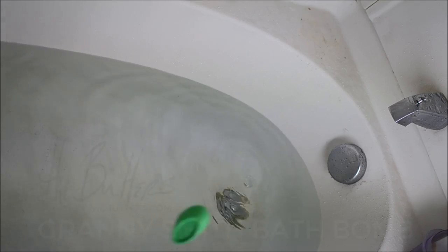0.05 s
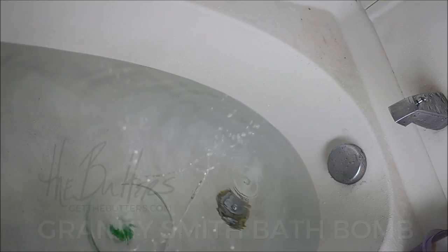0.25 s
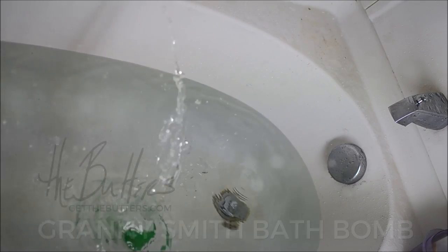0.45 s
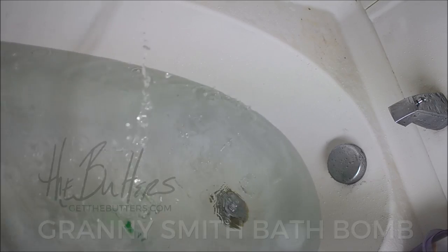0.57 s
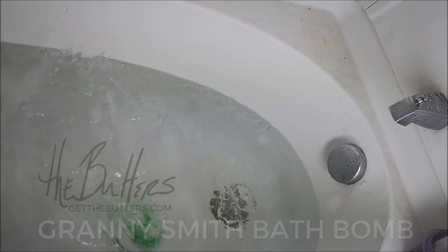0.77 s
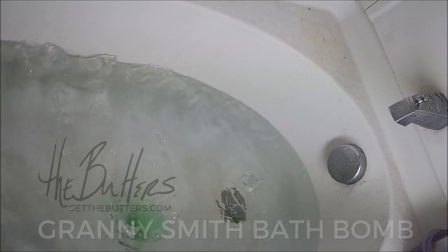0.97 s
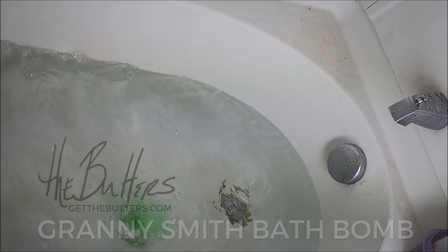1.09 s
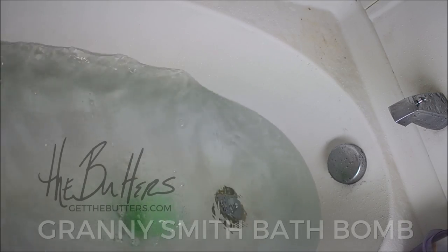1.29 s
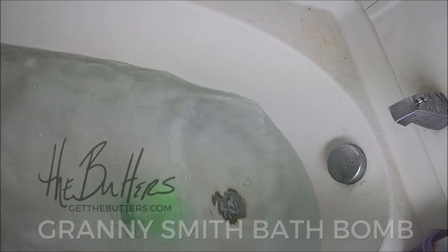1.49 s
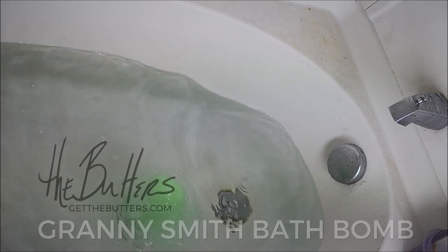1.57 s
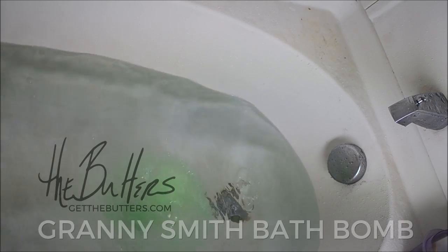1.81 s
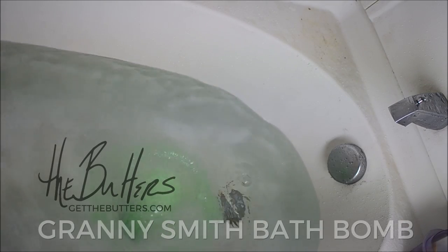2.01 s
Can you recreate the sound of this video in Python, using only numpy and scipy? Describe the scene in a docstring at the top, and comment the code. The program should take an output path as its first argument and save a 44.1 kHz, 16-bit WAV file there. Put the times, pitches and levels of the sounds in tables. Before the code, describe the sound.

A bath bomb drops into a full tub with a loud slapping splash and a hollow boom from the tub floor, then drops patter and bubble, fading to faint fizzing; close microphone, small tiled bathroom.

```python
"""Faint room tone and a few light ticks, then a slap: a solid ball drops into a full bathtub in a small tiled bathroom.
Its air cavity closes and it knocks the tub floor, which booms: damped sines for air pockets, decaying modes for the tub.
Thrown-up water falls back as bubbling drops and ticks: swarms of damped sines, shaped noise and short noise bursts.
Then the ball fizzes faintly: surging small bubbles under crackling noise. All but the room tone gets echoes and a tail."""
import sys
import numpy as np
from scipy import signal
from scipy.fft import rfft, irfft, next_fast_len
from scipy.io import wavfile
from scipy.ndimage import map_coordinates

SR = 44100
rng = np.random.default_rng(int(sys.argv[2]) if len(sys.argv) > 2 else 0)


def field_ratio(decibels):
    """Amplitude ratio for a level in dB (20 dB per decade); scalars and array-likes work."""
    return 10 ** (np.asarray(decibels, dtype=float) / 20)


def to_wav(s):
    """Save 16-bit WAV."""
    ch = np.atleast_2d(s).T  # columns
    pcm = np.round(np.clip(ch, -1, 1) * 32767)  # PCM
    wavfile.write(sys.argv[1], SR, pcm.astype(np.int16))


N = 90404

# Room tone spectrum: (frequency [Hz], relative level [dB per Hz])
AIR_SPECTRUM = [(30, -54), (60, -9), (262, -8), (480, -13), (620, -7), (730, -15), (953, -9.5), (1320, -17),
                (2360, -21.5), (5000, -39.5), (9000, -49), (15000, -74)]
# Droplets ticking on hard surfaces or bursting: (time [s], relative level [dB], centre [Hz])
TICKS = [(0.0728, -48, 8700), (0.158, -38, 11100), (0.2358, -39.5, 5100), (0.261, -26, 7340),
         (0.343, -37, 5220), (0.3724, -38.5, 5750), (0.405, -40, 5870), (0.4352, -38, 6530),
         (0.665, -29.5, 5960), (0.837, -42.5, 6440), (0.89, -34, 12500), (0.996, -42, 6400),
         (1.109, -51.5, 9700), (1.1754, -42, 9860), (1.2535, -48.5, 11450), (1.2989, -52, 12300)]
# Churned water: (time [s], bubbling [dB], spray [dB], slosh [dB], middle bubble pitch [Hz]), relative levels
SPLASH = [(.155, -36.5, -43, -43, 880), (.19, -31, -62.5, -38.5, 820), (.228, -49, -56.5, -35, 720),
          (.237, -16, -50, -36, 777), (.2555, -23, -42.5, -17, 847), (.259, -7, -25.5, -14.5, 1310),
          (.3, -14.5, -41, -12, 1335), (.33, -22, -80, -31, 1370), (.385, -37, -80, -23, 1780),
          (.41, -34, -59, -26.5, 2060), (.47, -48, -59, -53, 790), (.515, -37, -65, -40, 940),
          (.53, -33, -63.5, -37, 1220), (.573, -39, -65, -72, 1310), (.577, -36, -42.5, -45, 2230),
          (.62, -32.5, -55, -47, 1970), (.655, -28.5, -38, -63, 1690), (.67, -25, -41, -32.5, 1500),
          (.72, -29, -43.5, -52, 1640), (.76, -39, -50.5, -46, 1200), (.8, -51, -51, -42, 2300),
          (.87, -40, -65, -63, 2150), (.93, -37.5, -68, -43, 1390), (.99, -43.5, -61, -42, 1750),
          (1.05, -45.5, -55, -40, 1550), (1.09, -54.5, -73, -48.5, 905), (1.2, -49.5, -73, -66.5, 920)]
# Spray spectrum: (frequency [Hz], relative level [dB per Hz])
SPRAY_SPECTRUM = [(1760, -8.5), (3000, 3.5), (4230, -5), (9530, -15), (12600, -18), (16000, -40)]
# Slosh spectrum: (frequency [Hz], relative level [dB per Hz])
SLOSH_SPECTRUM = [(30, -39), (60, -5), (120, 0.5), (250, -13.5), (400, -6), (800, -45)]
# Blows on the tub: (time [s], relative level [dB], brightness about 200 Hz [dB per 2 octaves])
KNOCKS = [(.236, -15.5, -2), (.2585, -13, -6.5), (.272, -19.5, -3.5), (.287, -14.5, -5)]
# Tub modes: (frequency [Hz], relative level [dB], t60 [s])
TUB_MODES = [(77.4, -8, 0.48), (133.6, -19, 0.65), (175.5, -5.5, 0.58), (186, 7, 0.2), (229.1, -1, 0.44),
             (332.4, -3.5, 0.41), (636, -15, 0.387), (652, -0.5, 0.28), (710, 5.5, 0.2), (754.3, 2, 0.39),
             (812, -3.5, 0.38), (950, 1, 0.084), (1730, -5.5, 0.193), (2150, -43, .15)]
# Bubbles from the ball's closing air cavity and from falling drops: (time [s], relative level [dB], pitch [Hz],
# life [cycles])
BUBBLES = [(0.2369, -28, 1440, 6), (0.2588, -12.5, 1690, 4.6), (.258, -10.5, 713, 3.7),
           (.2612, -3.5, 708.5, 7.6), (0.27, -10, 219, 1.7), (.279, -23, 661, 7.6), (.283, -12, 173.2, 5),
           (0.319, -24, 1700, 6), (0.379, -33.5, 2630, 8.8), (.402, -31, 2800, 8.2),
           (.39, -24.5, 1653, 5.4), (0.352, -22, 950, 8.2), (0.396, -29, 2040, 3.7),
           (0.474, -38.5, 370, 13), (0.5203, -59, 6300, 26), (.521, -41, 1250, 3.4),
           (0.528, -33.5, 1363, 6.5), (.53, -41, 2930, 6.2), (0.54, -39, 1480, 16),
           (0.562, -35.5, 946, 5.1), (0.576, -24, 2420, 4.7), (0.58, -28.5, 6400, 4.8),
           (0.607, -34.5, 2684, 11), (0.617, -38, 1870, 22), (.626, -40, 3280, 16), (0.628, -32.5, 1530, 6),
           (.6394, -45, 6060, 20), (0.6559, -22, 1078, 9.8), (.667, -23, 885, 2.5), (0.701, -26, 4860, 7.6),
           (.716, -31, 4020, 19), (0.721, -34, 1400, 8.8), (0.691, -32, 1530, 14), (.685, -29.5, 702, 7.4),
           (0.689, -35.5, 489, 3.9), (.762, -48, 634, 22), (0.787, -37.5, 2685, 31), (0.804, -41, 2700, 22),
           (0.851, -47, 2425, 19), (0.868, -43.5, 3280, 8), (0.901, -50, 3750, 9.8), (0.866, -49, 5100, 13),
           (0.946, -46, 2970, 13), (1.007, -49, 3130, 10), (1.016, -51, 2860, 16), (1.034, -41, 990, 5.1),
           (1.043, -33, 980, 2.5), (1.058, -41.5, 955, 4.1), (1.05, -46, 4000, 14), (1.282, -53.5, 347, 26),
           (1.469, -52.5, 1625, 14), (1.5, -51, 2060, 10.6), (1.652, -52.5, 1050, 9),
           (1.661, -51, 2500, 13), (1.76, -52.5, 950, 14.5), (1.862, -54, 921, 42), (1.91, -56, 2150, 35),
           (1.925, -51.5, 620, 19), (2.016, -53, 950, 12.6)]
# Gas from the ball: (time [s], bubbling [dB], crackle [dB], middle bubble pitch [Hz]), relative levels
FIZZ = [(1.1, -63, -67.5, 1250), (1.43, -64, -62, 1550), (1.46, -60, -59, 1890), (1.55, -52.5, -61.5, 2670),
        (1.6, -55, -61, 2240), (1.67, -51.5, -61.5, 2600), (1.75, -53, -59, 1500), (1.82, -54, -62, 2060),
        (1.97, -50, -61.5, 2330), (2.05, -50, -60.5, 2410)]
# Crackle spectrum: (frequency [Hz], relative level [dB per Hz])
CRACKLE_SPECTRUM = [(2350, -5.5), (4000, -7), (5600, -10), (7140, -11), (12800, -11), (16000, -26)]
# Room decay: (frequency [Hz], t60 [s])
ROOM_T60 = [(100, 0.51), (600, 0.35), (2500, 0.28), (8000, 0.19), (15000, 0.21)]
# Overall tone, with a steep top cut: (frequency [Hz], gain [dB])
OVERALL_TONE = [(45, -1.5), (70, -2), (14000, -1.5), (15800, -12), (16500, -39)]

AIR_DB = -57
SPRAY_SPREAD_DB = 6.5
WANDER_RAD_AT_1KHZ, WANDER_PER_S = 1.7, 44.6  # water against the walls unsteadies each mode
BUILD_CYCLES = 0.79  # time constant of a mode's swing-up
PITCH_RISE = 0.034  # fraction, over one bubble life
# quieter bubbles of nearby pitch after each main bubble above 450 Hz
MATE_DELAY_S, MATE_PITCH_SPREAD, MATE_DB = .013, 0.0628, -5.5
TUB_ECHO_DB, TUB_ECHO_S = 4, 0.0069  # close tub-wall echoes: extra level, its decay time
FIRST_WALL_S, WATER_WET_DB = .005, -5.5
START_S = .011
TOP, KNEE = 1, 3.7  # input stage: ceiling, sharpness of rounding


def unit(x):
    """Scales to rms 1."""
    return x / np.sqrt(np.mean(x ** 2) + 1e-20)


def along(points, hz):
    """Interpolates (Hz, value) points on a log frequency axis."""
    f, v = np.transpose(points)
    return np.interp(np.log(hz + 1), np.log(f + 1), v)


def through(x, spectrum):
    """Filters x by a (Hz, dB) spectrum."""
    m = next_fast_len(N + 8192)
    gain = field_ratio(along(spectrum, np.fft.rfftfreq(m, 1 / SR)))
    return irfft(rfft(x, m) * gain, m)[..., :N]


def coloured(x, spectrum):
    """Filters x by a spectrum, then scales to rms 1."""
    return unit(through(x, spectrum))


def crackly(spread_db):
    """Noise whose samples differ randomly in size."""
    return rng.standard_normal(N) * field_ratio(spread_db * rng.standard_normal(N))


def curves(rows):
    """One value per sample for each column after the time."""
    s, *columns = np.transpose(rows)
    return [np.interp(np.arange(N) / SR, s, column) for column in columns]


def during(rows, fade_s):
    """Gate: open from the first row to the last, then fading."""
    t = np.arange(N) / SR
    return (t > rows[0][0]) * np.clip((rows[-1][0] - t) / fade_s + 1, 0, 1)


def surges(per_s, depth_db):
    """Smooth random gain."""
    points = rng.standard_normal(int(N * per_s / SR) + 4)
    return field_ratio(depth_db * map_coordinates(points, [np.arange(N) * per_s / SR]))


def ring(s, db, hz, cycles, rise, size=1400):
    """Bubbles: damped sines with soft start and rising pitch, summed at their times."""
    lives = np.arange(size) / SR * (hz / cycles)[:, None]
    phase = 2 * np.pi * cycles[:, None] * lives * (1 + rise * np.minimum(lives, 2) / 2)
    envelope = 3.03 * np.exp(-2 * lives) * (1 - np.exp(-5 * lives))
    fade_out = np.hanning(2 * size)[size:]
    wave = np.sin(phase) * envelope * fade_out * field_ratio(db)[:, None]
    at = np.round(s * SR).astype(int)[:, None] + np.arange(size)
    return np.bincount(at.ravel(), wave.ravel(), N + size)[:N]


def swarm(hz, octaves, cycles, spread_db, count=1500):
    """Many small bubbles at random times, levels and pitches around hz (per sample), rms 1."""
    when = rng.random(count)
    detune, loudness = rng.standard_normal(count), rng.standard_normal(count)
    pitch_hz = np.clip(hz[(when * N).astype(int)] * 2 ** (octaves * detune), 250, 9000)
    level_db = spread_db * loudness - 0.39 * np.abs(detune)
    return unit(ring(when * N / SR, level_db, pitch_hz, np.full(count, cycles), PITCH_RISE, size=400))


def room_tone():
    """Steady background: noise through a fixed spectrum."""
    return field_ratio(AIR_DB) * coloured(rng.standard_normal(N), AIR_SPECTRUM)


def ticks():
    """Each tick is a short noise burst through a broad resonance at its own centre."""
    out, t = np.zeros(N + SR), np.arange(800) / SR
    for s, db, hz in TICKS:
        envelope = field_ratio(-60 * t / 0.024) * (1 - np.exp(-t / 0.00069))
        burst = rng.standard_normal(len(t)) * envelope
        b, a = signal.iirpeak(min(hz, 15000), 1.4, SR)
        out[round(s * SR):][:len(t)] += field_ratio(db + 2.5) * signal.lfilter(b, a, burst)
    return out[:N]


def splash():
    """Churned and falling water: a swarm of bubbles under a fine spray, over a low slosh."""
    bubbling_db, spray_db, slosh_db, hz = curves(SPLASH)
    bubbles = swarm(hz, octaves=0.777, cycles=4.4, spread_db=3.94, count=7000)
    froth = field_ratio(bubbling_db - 9.5) * surges(60.17, 2.0) * bubbles
    spray = field_ratio(spray_db) * coloured(crackly(SPRAY_SPREAD_DB), SPRAY_SPECTRUM)
    slosh = field_ratio(slosh_db - 15.0) * coloured(rng.standard_normal(N), SLOSH_SPECTRUM)
    return during(SPLASH, 0.03) * (froth + spray + slosh)


def tub():
    """Each blow rings the tub's modes; level and phase wander, phase more in high modes."""
    out, t = np.zeros(N + SR), np.arange(SR // 2) / SR

    def drift():
        return map_coordinates(rng.standard_normal(40), [t * WANDER_PER_S], mode="nearest")

    for s, db, bright_db in KNOCKS:
        boom = np.zeros(len(t))
        for hz, mode_db, t60_s in TUB_MODES:
            tilt_db = bright_db * np.log2(hz / 200) / 2
            decay = field_ratio(mode_db + tilt_db + 1.0 * drift() - 60 * t / t60_s)
            wander_rad = WANDER_RAD_AT_1KHZ * np.sqrt(hz / 1000) * drift()
            build = 1 - np.exp(-t * hz / BUILD_CYCLES)
            boom += decay * build * np.sin(2 * np.pi * hz * t + wander_rad)
        out[round(s * SR):][:len(t)] += field_ratio(db - 9.5) * boom
    return out[:N]


def bubble_rings(count=6):
    """Each row rings a main bubble, from the ball's air cavity or from a drop; above 450 Hz, quieter ones of
    nearby pitch follow it."""
    s, db, hz, cycles = np.transpose(BUBBLES)
    shape = (len(s), count)
    late = rng.exponential(size=shape)
    detune, loudness = rng.standard_normal(shape), rng.standard_normal(shape)
    mates = (s[:, None] + MATE_DELAY_S * late,
             db[:, None] + MATE_DB + 0.6 * loudness - 5.7 * late,
             hz[:, None] * (1 + MATE_PITCH_SPREAD * detune),
             cycles[:, None] + 0 * late)
    has_mates = hz > 450  # large air pockets ring alone
    followers = ring(*(m[has_mates].ravel() for m in mates), PITCH_RISE, size=4000)
    return ring(s, db, hz, cycles, PITCH_RISE, size=4000) + followers


def fizz():
    """Gas from the dissolving ball comes in surges: small bubbles below, bursting at the surface above."""
    bubbling_db, crackle_db, hz = curves(FIZZ)
    bubbles = swarm(hz, octaves=0.474, cycles=8.6, spread_db=0.72, count=5000)
    gas = field_ratio(bubbling_db - 4.5) * surges(11.93, 1.0) * bubbles
    crackle = field_ratio(crackle_db) * surges(45.2, 2.1) * coloured(crackly(5.1), CRACKLE_SPECTRUM)
    return during(FIZZ, .1) * (gas + crackle)


def room(x, count=7):
    """Close echoes, then a tail dying by frequency; a fresh random tail for each equal stretch of time."""
    hz, t, z = signal.stft(rng.standard_normal((count, SR // 2)), SR, nperseg=256)
    echo_db = TUB_ECHO_DB * np.exp(-t / TUB_ECHO_S)
    decay_db = -60 * t / along(ROOM_T60, hz)[:, None]
    tails = signal.istft(z * field_ratio(echo_db + decay_db), SR, nperseg=256)[1]
    tails = tails / np.linalg.norm(tails[0])
    parts = x * (np.arange(N) * count // N == np.arange(count)[:, None])  # one stretch per tail
    wet = signal.fftconvolve(parts, tails, axes=1).sum(axis=0)
    return np.pad(wet, (round(FIRST_WALL_S * SR), 0))[:N]


def scene():
    """Sums room tone, ticks, water and tub boom, each source but the tone with its room sound."""
    snaps, knocks = ticks(), tub()
    water = splash() + bubble_rings() + fizz()
    mix = room_tone() + snaps + field_ratio(-2.0) * room(snaps)
    mix += water + field_ratio(WATER_WET_DB) * room(water)
    mix += knocks + field_ratio(-7) * room(knocks)
    return mix[None]


def roll_off(x):
    """The treble ends steeply here."""
    return signal.sosfilt(signal.butter(12, 16460, fs=SR, output="sos"), x)


def record(dry):
    """Overall tone, silence until START_S, then an input stage that rounds off the loudest peaks."""
    x = through(dry, OVERALL_TONE) * (np.arange(N) > START_S * SR)
    mix = x / (1 + np.abs(x / TOP) ** KNEE) ** (1 / KNEE)
    return roll_off(mix)


dry = scene()
out = record(dry)
to_wav(out)
```